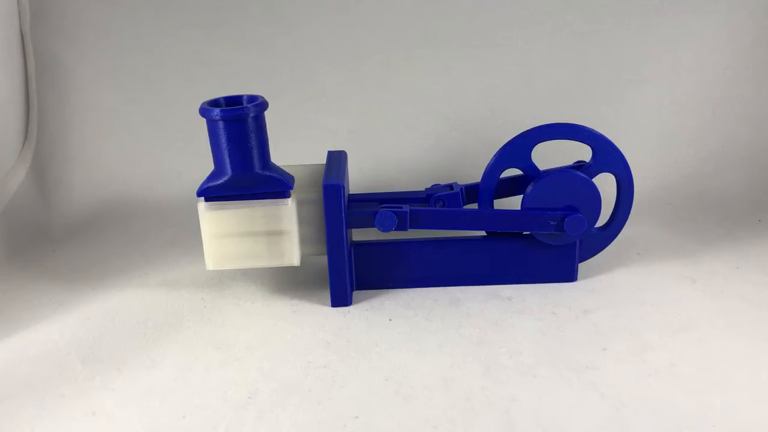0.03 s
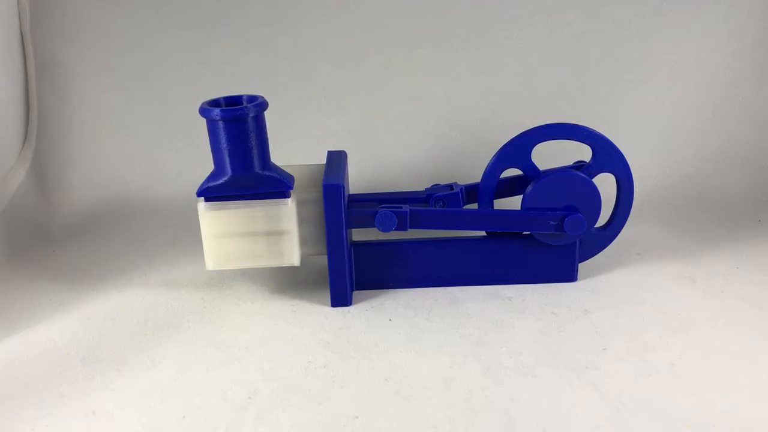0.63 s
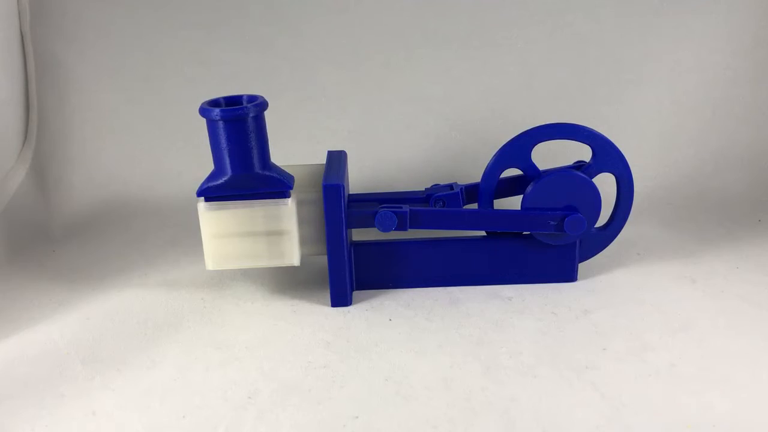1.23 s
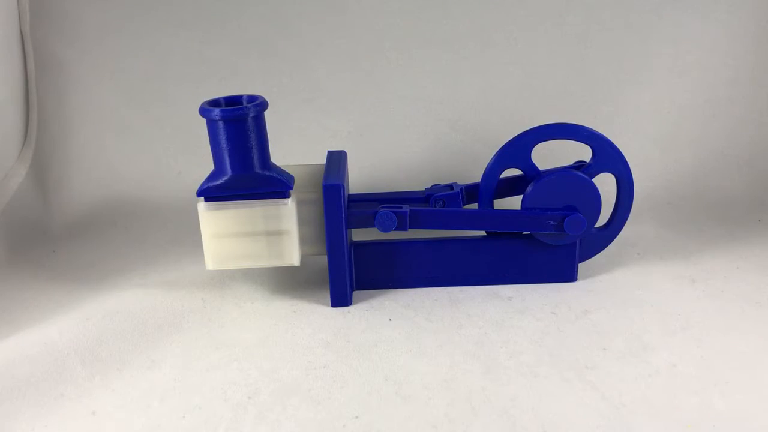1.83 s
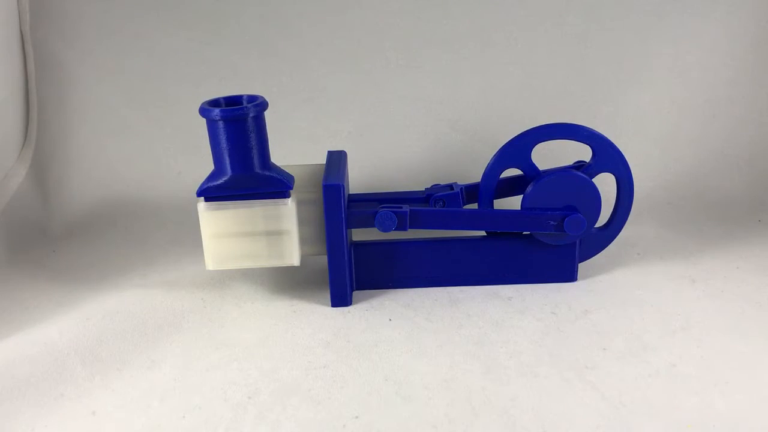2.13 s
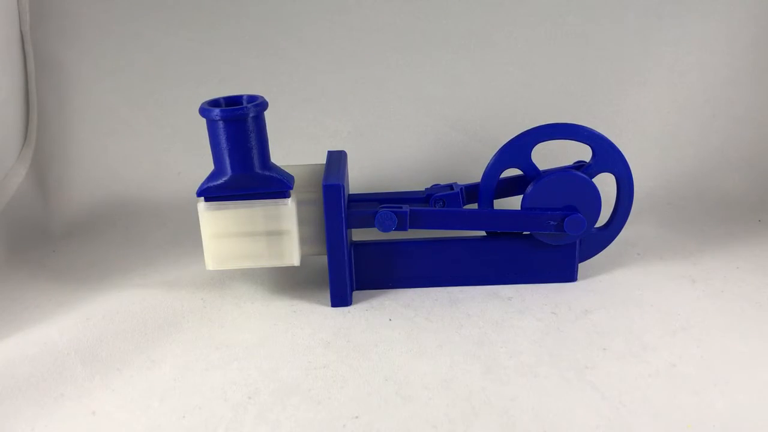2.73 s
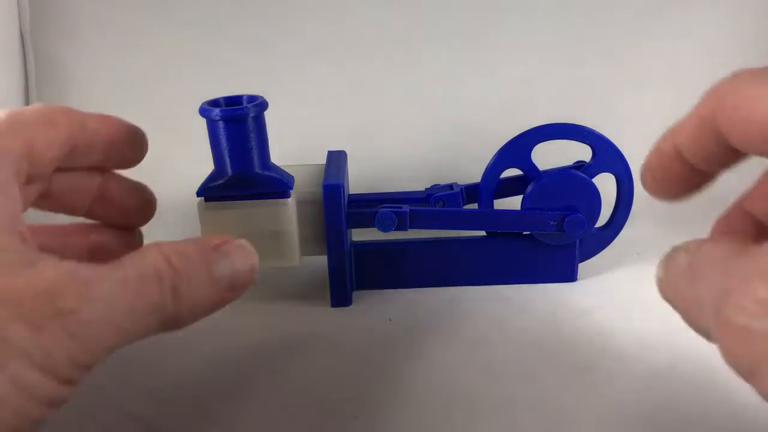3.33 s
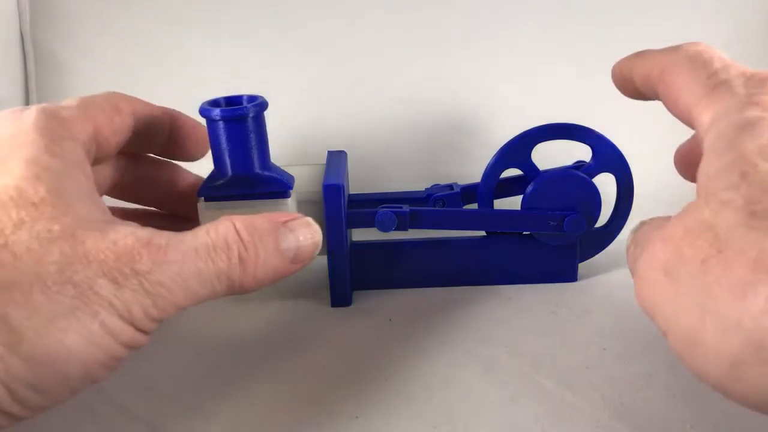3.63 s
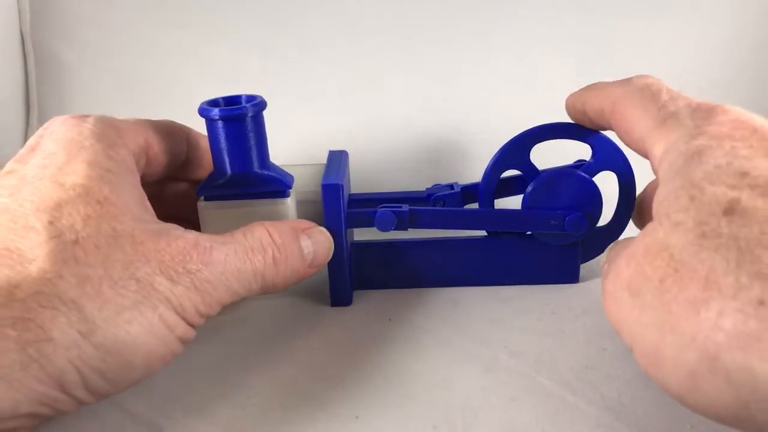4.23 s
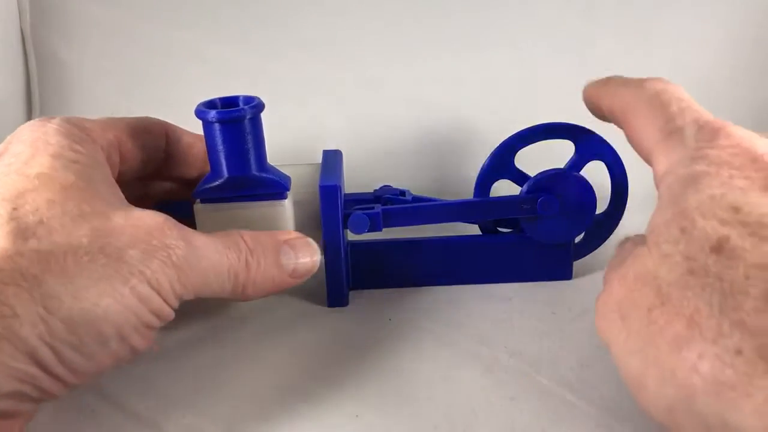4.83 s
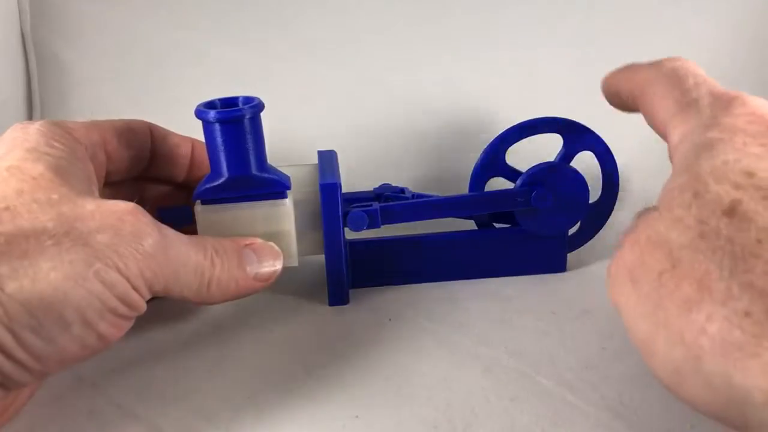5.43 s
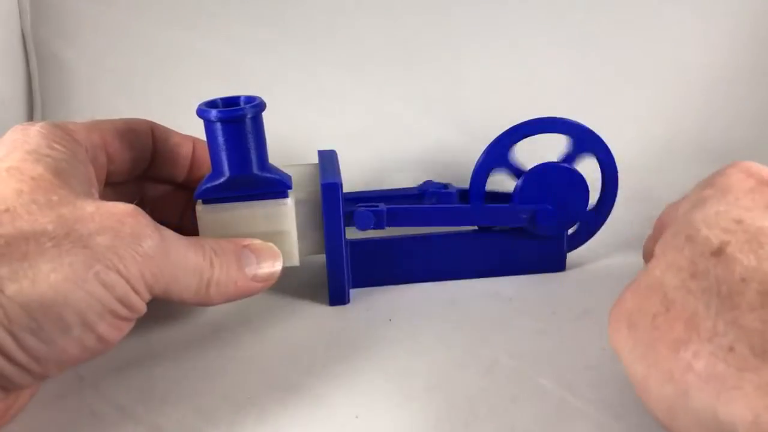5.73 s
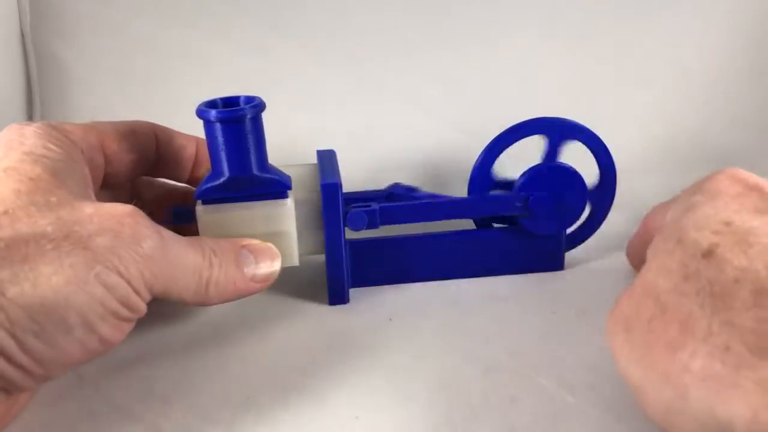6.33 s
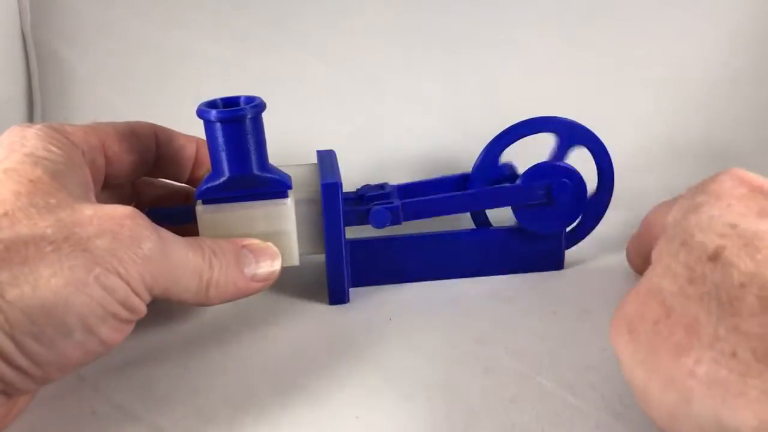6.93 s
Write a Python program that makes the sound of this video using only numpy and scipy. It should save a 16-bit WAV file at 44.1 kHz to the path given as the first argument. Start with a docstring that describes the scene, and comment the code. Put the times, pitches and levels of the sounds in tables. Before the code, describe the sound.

A small plastic model engine rattles, clacks and thumps as a finger flicks its flywheel five times, over quiet room hum.

```python
"""A small plastic model engine on a table in a quiet room, heard close up on one microphone.
First there is only room tone: ventilation rumble, fan hum and hiss. From about 2.4 s hands rustle in,
and near 4 s fingers tap the frame as one hand steadies it. From 4.5 s a finger flicks the flywheel
five times, scraping over its ribbed rim while the loose crank and piston rub. From the second flick
on, the joints also clack and each fast stroke ends in a hollow thump."""
import sys
import numpy as np
from scipy import signal
from scipy.fft import rfft, irfft, next_fast_len
from scipy.io import wavfile
from scipy.ndimage import uniform_filter1d, map_coordinates

SR = 44100
rng = np.random.default_rng(int(sys.argv[2]) if len(sys.argv) > 2 else 0)


def put_to_file(sound):
    """Save the sound as 16-bit audio at rate SR, in the file named by the first command-line argument."""
    columns = np.atleast_2d(sound).T  # one column per channel
    safe = np.clip(columns, -1, 1)
    whole_steps = np.round(safe * 32767)
    wavfile.write(sys.argv[1], SR, whole_steps.astype(np.int16))


N = 308700
TIME = np.arange(N) / SR
RING_SAMPLES = 4096
RING_HZ = np.fft.rfftfreq(RING_SAMPLES, 1 / SR)

# Levels are relative within each table; the functions set each source's place in the mix.
# spectra of ventilation, hiss and rustling skin: (frequency [Hz], level [dB])
RUMBLE_SPECTRUM = [(13, -45), (22, -19), (59, -5), (86, -8), (125, 2), (144, -6.5), (158, -9), (220, -13.5),
                   (273, -3.5), (311, -13), (392, -11.5), (447, -22), (474, -18), (509, -26), (700, -27.5),
                   (910, -52), (1540, -120)]
HISS_SPECTRUM = [(290, -33), (500, -5), (578, -2.5), (1080, -8), (1280, -8.5), (1480, -11.5), (2650, -12),
                 (2770, -16), (3020, -14), (5800, -15), (7750, -21), (14700, -23.5), (16000, -25.5)]
SKIN_SPECTRUM = [(120, -11), (300, 15.5), (600, 4), (1300, 3), (1800, 1.5), (4000, 1.5), (7000, -3),
                 (16000, -7.5)]
# tones of the fan: (frequency [Hz], level [dB])
FAN_TONES = [(134.6, -65.5), (269.2, -83), (479, -84.5), (585, -88), (1260, -84.5), (2864, -88.5),
             (4581, -93)]
# hands closing in and holding the frame: (time [s], level [dB])
HAND_LEVELS = [(2.4, -81), (3.0, -74), (3.5, -69), (4.3, -73), (4.8, -71.5), (5.5, -78), (6.1, -81),
               (6.7, -74.5)]
# fingers touching the frame: (time [s], peak level [dB], centre [Hz])
FINGER_TAPS = [(3.8028, -40.5, 4550), (3.816, -43, 5370), (3.942, -43, 6460), (4.0717, -42, 3500),
               (4.1063, -39, 2690), (4.138, -39.5, 3300), (4.313, -51.5, 3480), (4.9581, -43, 3200),
               (5.1433, -50, 2250), (5.1543, -37.5, 3500)]
# the room's reverberation: (frequency [Hz], t60 [s])
ROOM_DECAY = [(200, 0.47), (1000, 0.52), (4000, 0.41), (14000, 0.3)]
# swings of crank and piston, driven by a flick or rolling on after it:
# (time [s], speeding up [s], coasting [s], top level [dB], treble edge [dB])
CRANK_SWINGS = [(4.473, 0.086, 0.017, -35.5, -14), (5.159, 0.061, 0.071, -34.5, -11),
                (5.309, 0.0066, 0.098, -41.5, -9), (5.704, 0.032, 0.068, -32.5, -5),
                (5.808, 0.048, 0.051, -38, -11), (6.288, 0.066, .082, -33.5, -3.5),
                (6.42, .006, .034, -39.5, -13.5), (6.873, 0.055, 0.052, -31, -3.5)]
# resonances of linkage and flywheel: (frequency [Hz], width [Hz], level [dB])
LINK_RESONANCES = [(1225, 29, -6), (2784, 137, 0), (3320, 110, -2), (3720, 24, 3), (4244, 115, 2.5),
                   (4700, 220, -8), (5200, 97, -7.5), (5550, 630, -9), (6110, 190, -6.5), (6860, 230, -8),
                   (7500, 250, -31), (8400, 270, -14), (8880, 46, -21), (9350, 100, -28.5),
                   (12000, 53, -24), (12100, 38, -27), (13400, 130, -30), (14600, 65, -19)]
WHEEL_RESONANCES = [(750, 150, -10.5), (1195, 38, -5), (1900, 124, -7.5), (2180, 120, -7), (2790, 200, -7),
                    (3710, 130, -3), (3970, 80, -5), (4250, 180, -4), (5100, 85, 4), (5160, 97, 0),
                    (5480, 120, -14), (6320, 140, -2.5), (6900, 100, -11), (7700, 330, -11),
                    (8500, 160, -8), (11600, 400, -18)]
# the bed of dense weak resonances between them: (frequency [Hz], level [dB])
LINK_BED = [(150, -51), (250, -7.5), (802, -4.5), (1060, -9), (1220, -3.5), (1670, -9.5), (2760, -6),
            (3060, -15.5), (3650, 5), (3980, -23), (4340, -11.5), (10700, -14), (14700, -16), (16000, -26)]
WHEEL_BED = [(200, -30), (400, -19), (700, 1), (1000, -13), (2200, -8.5), (3200, -10), (5100, -4.5),
             (8500, -5.5), (13500, -10.5), (15000, -12), (16000, -20)]
# the finger pushing the rim: (time [s], length [s], level [dB])
RIM_PUSHES = [(4.499, 0.041, -35), (5.196, 0.019, -35.5), (5.735, .013, -35.5), (6.314, 0.028, -43),
              (6.897, 0.027, -36.5)]
# the fingertip snapping past a spoke: (time [s], peak level [dB], favoured resonance [Hz])
SPOKE_SNAPS = [(4.4965, -22, 4100), (4.5025, -19, 2120), (4.5124, -21, 4100), (4.5234, -20.5, 6300),
               (4.5386, -25, 3800), (4.55, -21, 4330), (5.1911, -21.5, 2200), (6.3225, -27, 2220)]
# joints taking up their play: (time [s], peak level [dB], favoured resonance [Hz])
JOINT_CLACKS = [(5.161, -25.5, 4060), (5.2124, -15, 3650), (5.3155, -26.5, 3670), (5.3827, -30.5, 4240),
                (5.4104, -40, 3320), (5.7051, -15.5, 4300), (5.7311, -18, 3630), (5.7392, -11.5, 3740),
                (5.7776, -22, 4320), (5.8207, -24.5, 6950), (5.8756, -26.5, 4220), (6.286, -33, 4400),
                (6.314, -24.5, 3730), (6.326, -22.5, 3740), (6.3382, -19.5, 3820), (6.386, -24, 6920),
                (6.427, -19.5, 4400), (6.5038, -37, 4300), (6.5468, -40, 2740), (6.567, -41.5, 3780),
                (6.8535, -24, 6300), (6.9149, -16, 4320), (6.9306, -23, 4260), (6.958, -13.5, 4450)]
# the piston's hollow thumps: (time [s], level [dB], boom pitch [Hz], boom t60 [s])
PISTON_THUMPS = [(5.227, -29.5, 124.3, 0.13), (5.758, -28.5, 125, 0.11), (6.351, -25, 128.5, 0.083),
                 (6.928, -27, 146, 0.041), (6.961, -39.5, 80, 0.33)]


def amp(db):
    """Decibels to gain."""
    return 10 ** (np.asarray(db) / 20)


def unit(x):
    """Scale to rms 1."""
    return x / np.sqrt(np.mean(x ** 2) + 1e-20)


def along(points, hz):
    """Read (frequency, value) points on a log frequency axis."""
    freqs, values = np.transpose(points)
    return np.interp(np.log(hz + 1), np.log(freqs + 1), values)


def wobble(rate):
    """A smooth random curve, rate knots a second."""
    return map_coordinates(rng.standard_normal(int(N * rate / SR) + 4), [TIME * rate])


def filtered(x, response):
    """Filter x by a gain that is a function of frequency."""
    size = next_fast_len(N + SR // 2)
    return irfft(rfft(x, size) * response(np.fft.rfftfreq(size, 1 / SR)), size)[:N]


def noise(spectrum):
    """Noise of rms 1 with the given spectrum."""
    return unit(filtered(rng.standard_normal(N), lambda hz: amp(along(spectrum, hz))))


def room_tone(rumble_db=-59.5, hiss_db=-71.66, hum_trim_db=-1):
    """Behind the table: ventilation rumble, soft hiss and a wavering fan hum."""
    out = amp(rumble_db) * noise(RUMBLE_SPECTRUM) + amp(hiss_db) * noise(HISS_SPECTRUM)
    for hz, db in FAN_TONES:
        level = amp(db + hum_trim_db + 1.5 * wobble(7))
        out += level * unit(np.sin(2 * np.pi * hz * TIME + 0.8 * wobble(7)))
    return out


def hand_rustle():
    """Skin and sleeves rub faintly as the hands close in and hold the frame."""
    level_db = np.interp(TIME, *np.transpose(HAND_LEVELS)) + 1.1 * wobble(13)
    return amp(level_db) * noise(SKIN_SPECTRUM)


def bell(hz, octaves):
    """A bell curve of height 1 around a frequency."""
    return 1 / (1 + (2 * np.log2((RING_HZ + 1) / hz) / octaves) ** 2)


def contact_spot(depth_db, width_hz=260):
    """Random gain over frequency: each point of contact favours its own share of the resonances."""
    knots = rng.standard_normal(RING_SAMPLES)
    return amp(depth_db * map_coordinates(knots, [RING_HZ / width_hz]))


def impulse_response(gain):
    """The minimum-phase ring, of energy 1, of a part with this gain on RING_HZ."""
    cepstrum = irfft(np.log(np.maximum(gain, 1e-6)))
    cepstrum[1:RING_SAMPLES // 2] *= 2
    cepstrum[RING_SAMPLES // 2 + 1:] = 0
    response = irfft(np.exp(rfft(cepstrum)))
    return response / np.linalg.norm(response)


def strike(gain, chatter_t60, blow):
    """One blow and its quickly dying chatter ring a part; peak about 1."""
    t = np.arange(RING_SAMPLES) / SR
    force = rng.standard_normal(RING_SAMPLES) * amp(-60 * t / chatter_t60)
    force[0] += blow
    ring = signal.fftconvolve(force, impulse_response(gain))
    loudest_rms = np.sqrt(uniform_filter1d(ring ** 2, size=128).max())
    return ring / loudest_rms / 2.63


def finger_taps(trim_db=-1, soft_hz=9000):
    """Light touches on the frame, each waking one region of the plastic's dense resonances."""
    out = np.zeros(N)
    softness = 1 / np.sqrt(1 + (RING_HZ / soft_hz) ** 4)
    for start, db, hz in FINGER_TAPS:
        gain = bell(hz, octaves=1.4) * softness * contact_spot(depth_db=3)
        add(out, start, amp(db + trim_db) * strike(gain, chatter_t60=0.027, blow=2.4))
    return out


def add(track, start, sound):
    """Mix a sound in at start seconds."""
    part = track[round(start * SR):][:len(sound)]
    part += sound[:len(part)]


def room_reverb(x, wet_db=-21, delay_s=0.006):
    """The room's answer, faint this close to the engine; each frequency dies at its own speed."""
    hz, t, spectra = signal.stft(rng.standard_normal(SR), SR, nperseg=256)
    decay = amp(-60 * t / along(ROOM_DECAY, hz)[:, None])
    tail = signal.istft(spectra * decay, SR, nperseg=256)[1]
    tail = np.pad(tail / np.linalg.norm(tail), (round(delay_s * SR), 0))
    return amp(wet_db) * signal.fftconvolve(x, tail)[:N]


def plastic(resonances, bed, bed_db):
    """Gain of a plastic part: distinct resonances standing on a bed of dense weak ones."""
    peaks = sum(amp(db) ** 2 / (1 + (2 * (RING_HZ - hz) / width) ** 2) for hz, width, db in resonances)
    bass_cut = RING_HZ ** 2 / (RING_HZ ** 2 + 220 ** 2)
    return np.sqrt(peaks + amp(along(bed, RING_HZ) + bed_db) ** 2) * bass_cut


def stick_slip(gain, spread_db, slips_per_s=6000, spots=5):
    """Printed ridges catch and slip at random moments, while the contact wanders from spot to spot."""
    out = np.zeros(N)
    for _ in range(spots):
        slips = rng.random(N) < slips_per_s / spots / SR
        sizes = amp(spread_db * np.clip(rng.standard_normal(N), -2, 1)) * rng.choice([-1, 1], N)
        share = amp(6.2 * np.clip(wobble(90), -1, 1))
        ring = impulse_response(gain * contact_spot(depth_db=2.5))
        out += signal.oaconvolve(slips * sizes * share, ring)[:N]
    return unit(out)


def held(start, length, rise_db_per_s, fall_db_per_s):
    """Gain that swells up to start, holds at 1 for length seconds and dies away."""
    before, after = np.maximum(start - TIME, 0), np.maximum(TIME - start - length, 0)
    return amp(-rise_db_per_s * before - fall_db_per_s * after)


def linkage_rub(trim_db=-1, edge_boost_db=6, edge_hz=8000):
    """Crank and piston rub in their guides: louder with speed, softer and duller as friction brakes."""
    rub = stick_slip(plastic(LINK_RESONANCES, LINK_BED, bed_db=-4.5), spread_db=2.5)
    edge = filtered(rub, lambda hz: 1 - 1 / (1 + (hz / edge_hz) ** 8))
    out = np.zeros(N)
    for start, speed_up, coast, db, edge_db in CRANK_SWINGS:
        # the wheel breaks loose at once and sticks abruptly at the end
        moving = held(start, speed_up + coast, rise_db_per_s=4000, fall_db_per_s=1100)
        speed = held(start + speed_up, 0, rise_db_per_s=227, fall_db_per_s=148)
        dulling = held(start + speed_up, 0, rise_db_per_s=0, fall_db_per_s=110)
        sharpness = amp(edge_db + edge_boost_db) * dulling
        out += amp(db + trim_db) * moving * speed * (rub - edge + sharpness * edge)
    return out


def flywheel_flicks(snap_trim_db=-2, focus_db=7):
    """The finger grips the ribbed rim, drags over it and slips off, at times snapping past a spoke."""
    wheel = plastic(WHEEL_RESONANCES, WHEEL_BED, bed_db=-11)
    pressure = sum(amp(db) * held(start, length, rise_db_per_s=1000, fall_db_per_s=800)
                   for start, length, db in RIM_PUSHES)
    out = stick_slip(wheel, spread_db=1) * pressure
    for start, db, hz in SPOKE_SNAPS:
        gain = wheel * amp(focus_db * bell(hz, octaves=0.41)) * contact_spot(depth_db=1.5)
        add(out, start, amp(db + snap_trim_db) * strike(gain, chatter_t60=0.039, blow=1))
    return out


def joint_clacks(trim_db=-1, focus_db=9, neutral_db=-24.5):
    """Loose joints knock and chatter as the load on them reverses; harder clacks are brighter."""
    out = np.zeros(N)
    linkage = plastic(LINK_RESONANCES, LINK_BED, bed_db=-6.5)
    octaves = np.log2(np.maximum(RING_HZ, 1000) / 4000)
    for start, db, hz in JOINT_CLACKS:
        tilt_db_per_octave = max(0.29 * (db - neutral_db), -2)
        focus = amp(focus_db * bell(hz, octaves=0.3))
        gain = linkage * amp(tilt_db_per_octave * octaves) * focus * contact_spot(depth_db=1.5)
        add(out, start, amp(db + trim_db) * strike(gain, chatter_t60=0.035, blow=2.5))
    return out


def piston_thumps(knock_db=-10, knock_hz=580, fall_hz_per_s=45000, knock_s=0.0039,
                  overtone_db=-5, overtone_hz=225, overtone_t60=0.038):
    """The piston's stroke ends in a short hollow knock of falling pitch, then frame and table boom."""
    out, t = np.zeros(N), np.arange(SR // 3) / SR
    lag = t - 2 * knock_s  # time from the middle of the knock
    knock_phase = 2 * np.pi * (knock_hz - fall_hz_per_s * lag / 2) * lag
    knock = np.exp(-(lag / knock_s) ** 2) * np.sin(knock_phase)
    overtone = amp(overtone_db - 60 * t / overtone_t60) * np.sin(2 * np.pi * overtone_hz * t)
    rise = 1 - np.exp(-t / 0.0025)
    for start, db, hz, t60 in PISTON_THUMPS:
        add(out, start - 2 * knock_s, amp(db + knock_db) * knock)
        boom = amp(-60 * t / t60) * np.sin(2 * np.pi * hz * t)
        add(out, start + 0.0014, -amp(db) * rise * (boom + overtone))
    return out


def scene():
    """At the microphone, in mono: engine and hands close by, the room behind them."""
    engine = flywheel_flicks() + linkage_rub() + joint_clacks() + finger_taps() + piston_thumps()
    return (engine + room_reverb(engine) + hand_rustle() + room_tone())[None]


def record(dry, start_s=0.118, low_hz=32, top_hz=15900):
    """The recorder opens after a moment, sheds the deepest bass and keeps nothing above top_hz."""
    opened = np.clip((TIME - start_s) / 0.003, 0, 1)
    passband = lambda hz: (1 - 1 / (1 + (hz / low_hz) ** 6)) * (hz < top_hz)
    return filtered(dry[0] * opened, passband)[None]


dry = scene()
out = record(dry)
put_to_file(out)
```